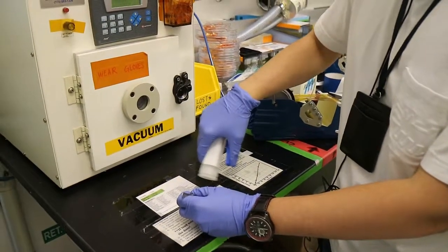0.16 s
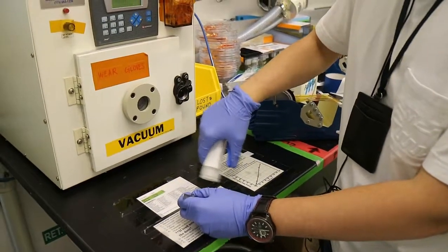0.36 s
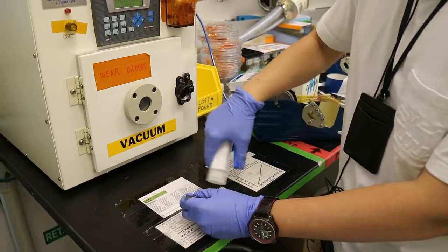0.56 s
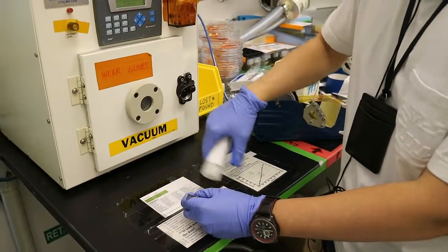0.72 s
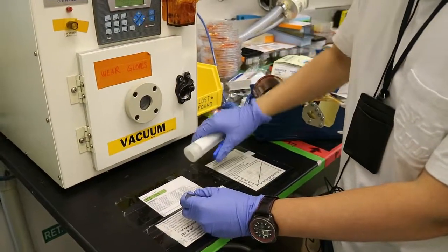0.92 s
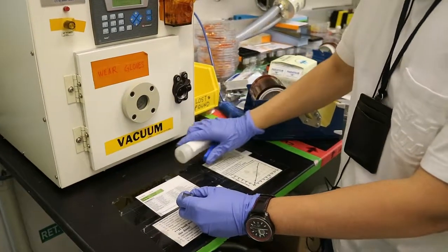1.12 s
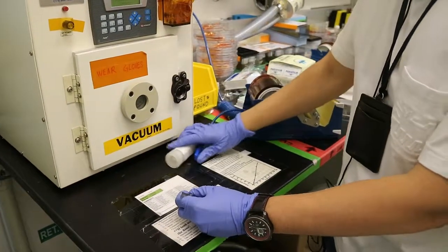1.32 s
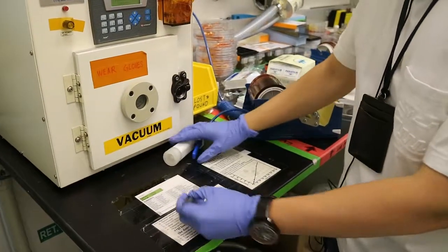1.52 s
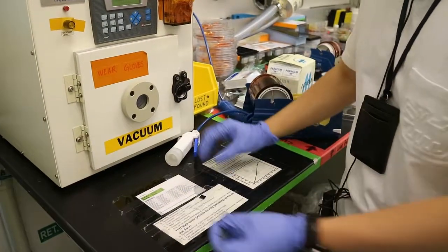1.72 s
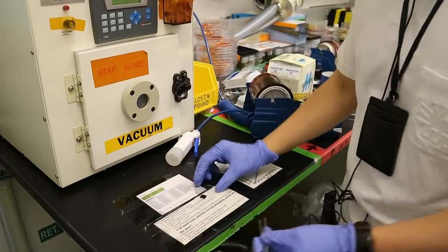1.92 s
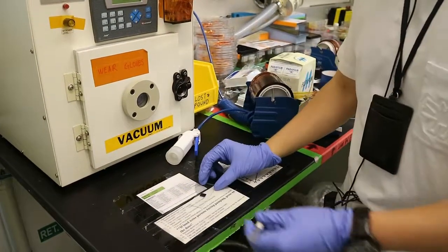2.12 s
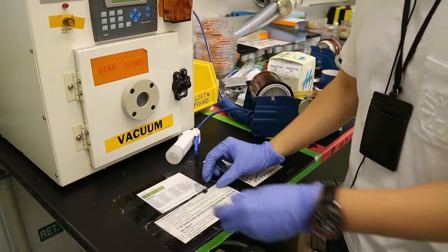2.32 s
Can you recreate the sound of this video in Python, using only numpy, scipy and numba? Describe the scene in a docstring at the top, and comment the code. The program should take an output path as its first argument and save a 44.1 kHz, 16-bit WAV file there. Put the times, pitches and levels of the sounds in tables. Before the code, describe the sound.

A handheld air blower hisses brightly and steadily, then shuts off sharply; after a short gap it lands on a bench with a light tap and one loud knock, over close pump buzz and ventilation in a small lab.

```python
"""A laboratory bench: a handheld air blower hisses, shuts off and is laid down with a tap and a hard knock.
The hiss is noise, partly passed through wandering nozzle resonances; the knocks are short pushes that ring
the bench. A small pump nearby ticks about sixty times a second through its ringing casing, over shaped
ventilation noise with thin tones. Brief small ticks include the bright click of the blower's first touch.
The phone's gain control creeps up while the sound is soft and ducks at the knock, whose peaks clip."""
import sys
import numpy as np
from scipy import signal
from scipy.fft import rfft, irfft
from scipy.io import wavfile
from scipy.ndimage import uniform_filter1d, map_coordinates
from numba import njit

SR = 44100
rng = np.random.default_rng(int(sys.argv[2]) if len(sys.argv) > 2 else 0)


def to_wav(sig):
    """Store sig (one row per channel, or 1-D mono) as 16-bit WAV at the path in sys.argv[1].

    Samples outside -1..1 are clipped; the rate is SR.
    """
    pcm = np.clip(np.atleast_2d(sig), -1, 1) * 32767
    pcm = np.round(pcm).astype(np.int16)
    wavfile.write(sys.argv[1], SR, pcm.T)  # frames by channels


def elevation(decibels):
    """Turn decibel levels (scalar or array-like) into linear amplitude ratios."""
    levels = np.asarray(decibels, float)
    return 10 ** (levels / 20)


N = 104428  # length in samples
MODE_SCATTER_DB = 1.5  # each resonance differs a little from blow to blow


@njit
def svf(x, hz, width):
    """Band-pass filter whose centre may move from sample to sample; gain 1 at the centre."""
    y, band, low = np.empty(len(x)), 0., 0.
    for i in range(len(x)):
        g, k = np.tan(np.pi * hz[i] / SR), width / hz[i]
        v = (band + g * (x[i] - low)) / (1 + g * (g + k))
        band = 2 * v - band
        low = low + 2 * g * v
        y[i] = k * v
    return y


def level(x, db):
    """Scale a sound so that its rms (average strength) is db."""
    return x * elevation(db) / np.sqrt(np.mean(x ** 2))


def colour(x, table):
    """Shape a spectrum through points of (Hz, dB), then set the rms to 1."""
    hz = np.arange(N // 2 + 1) * SR / N + 1
    point_hz, point_db = np.array(table).T
    gain = elevation(np.interp(np.log(hz), np.log(point_hz), point_db))
    return level(irfft(rfft(x) * gain, N), 0)


def walk(rate):
    """Slow random curve: levels held for 1 / rate seconds, then smoothed twice."""
    hold = int(SR / rate)
    steps = np.repeat(rng.standard_normal(N // hold + 1), hold)
    return 1.58 * uniform_filter1d(uniform_filter1d(steps, hold), hold)[:N]


def ring(x, hz, t60):
    """One resonance struck by x, dying away by 60 dB in t60 seconds."""
    return signal.lfilter([1], [1, -np.exp((2j * np.pi * hz - np.log(1000) / t60) / SR)], x).imag


def spikes(times, sizes):
    """Sharp clicks that may fall between samples, each drawn as a short windowed sinc."""
    out, at = np.zeros(N + 64), np.asarray(times) * SR
    for k in range(-7, 9):
        i = np.floor(at).astype(int) + k
        window = np.cos(np.pi * (i - at) / 17) ** 2
        np.add.at(out, np.clip(i, 0, N + 63), sizes * np.sinc(i - at) * window)
    return out[:N]


def jet(t):
    """Turbulent noise in wandering nozzle resonances; at shut-off level and pitch sag, treble first."""
    # The effort of the air jet. Each row: time in seconds, level in dB, extra treble in dB.
    effort = np.array([(0, -23, -1.5), (.1, -25.5, 5), (.24, -23.5, 1), (.27, -28.5, 6.5), (0.299, -22, 0),
                       (.45, -23, 4), (.6, -22.5, 3.5), (.75, -23, 1.5), (.865, -21.5, 1)])
    # Resonances of nozzle and jet. Each row: centre in Hz, rough width in Hz,
    # strength in dB (4.5 dB is taken off all of them).
    nozzle = [(793, 105, -9.5), (1224, 68, -17.5), (1570, 220, -11.5), (2720, 510, -6.5), (3450, 290, 0),
              (4057, 144, 1.5), (4650, 160, -9.5), (4800, 300, -10.5), (9600, 530, -2), (9300, 760, -5.5),
              (11760, 840, -13.5), (12500, 500, -27)]
    # Spectrum of the broad hiss. Each row: frequency in Hz, relative level in dB.
    broad_spectrum = [(300, -32), (1000, -11.5), (2000, -15.5), (4000, 4), (5500, -3), (7800, -7.5),
                      (9500, -6), (10700, -11.5), (12000, -6.5), (13500, -7.5), (14600, -7), (15700, -10)]
    shut_s, shut_db_per_s, shut_treble_db_per_s, shut_sag_per_s = 0.863, -350, -200, -1.4
    surge_db, broad_flicker_db, flicker_db = .8, 1.5, .5
    broad_db, treble_hz = -3, 7000
    mirror_db, mirror_s, mirror_wander_s = -9, .0008, .00008

    shut = np.clip(t - shut_s, 0, .3)  # seconds since shut-off, at most 0.3
    db = np.interp(t, effort[:, 0], effort[:, 1]) + shut_db_per_s * shut + surge_db * walk(29.67)
    treble = np.interp(t, effort[:, 0], effort[:, 2]) + shut_treble_db_per_s * shut

    # The broad hiss follows the treble by half.
    hiss_gain = elevation(broad_db + .5 * treble + broad_flicker_db * walk(64.2))
    out = hiss_gain * colour(rng.standard_normal(N), broad_spectrum)
    # The bench reflects it, with a delay that wanders as the hand moves.
    delayed = (t - mirror_s - mirror_wander_s * walk(5)) * SR
    out += elevation(mirror_db) * map_coordinates(out, [delayed], mode="mirror")

    for hz, width, peak_db in nozzle:
        centre = hz * np.clip(1 + .004 * walk(25.8) + shut_sag_per_s * shut, .5, 1.1)
        # Filtering twice narrows the band, so each pass is made wider.
        once = svf(rng.standard_normal(N), centre, 1.48 * width)
        band = level(svf(once, centre, 1.48 * width), peak_db - 4.5)
        out += band * elevation(flicker_db * walk(40.7) + treble * (hz > treble_hz))
    return out * elevation(db)


def knocks(t):
    """The blower meets the bench: smooth pushes ring its resonances, plus a noisy crack and a thud."""
    # The blows. Each row: start in seconds, level in dB, contact time in seconds,
    # crack level in dB, tilt of the ringing in dB per octave (around 1000 Hz).
    blows = [(1.3742, -6.5, 0.00054, -20, -4.5), (1.381, -14, .001, -27, 9), (1.3915, -21, 0.0007, -25, -1),
             (1.401, -27, .001, -30, -9), (1.4122, 8.5, 0.00028, -21, 2), (1.416, 8.5, 0.00051, -25, 5),
             (1.4195, 7.5, 0.00047, -30, -3), (1.4315, -22, 0.00015, -28.5, -3),
             (1.447, -25, 0.0005, -33, -10), (1.467, -5, 0.0013, -29, 6)]
    # Resonances of bench and blower. Each row: frequency in Hz, level in dB,
    # time to fall 60 dB in seconds (capped below).
    bench = [(410, -11, .07), (510, -11, .05), (600, -10, .05), (685, 0, .045), (820, -5, .04),
             (1000, -2, .035), (1227, -5, .035), (1500, -8, .03), (1760, -10, .02), (2000, -12, .02),
             (2330, -11, .02), (2750, -10, .015), (3400, -10, .013), (4400, -10, .01)]
    crack_s, crack_top_hz = 0.00054, 4970
    thud_hz, thud_db = 187, -18
    ring_cap_s_hz, bench_low_hz = 45, 250  # longest ring in seconds times Hz; low limit

    out, weights = np.zeros(N), rng.standard_normal((len(blows), len(bench)))
    for (at, db, contact, crack_db, tilt_db), chance in zip(blows, weights):
        since = np.clip(t - at, 0, 1)
        push = np.sin(np.pi * np.clip(since / contact, 0, 1)) ** 2
        push = push / push.sum()
        body = 0
        for k, (hz, mode_db, t60) in enumerate(bench):
            mode_gain = elevation(mode_db + tilt_db * np.log2(hz / 1000) + MODE_SCATTER_DB * chance[k])
            # Neighbouring resonances get opposite signs.
            body = body + (-1) ** k * mode_gain * ring(push, hz, min(t60, ring_cap_s_hz / hz))
        burst = (t > at) * np.exp(-since / crack_s) * rng.standard_normal(N)
        crack = svf(burst, np.full(N, .5 * crack_top_hz), 1. * crack_top_hz)
        thud = ring(push, thud_hz, 0.01)
        out += elevation(db) * (.5 * body + elevation(crack_db) * crack + elevation(thud_db) * thud)
    # The knocks keep little bass.
    return signal.lfilter(*signal.butter(1, bench_low_hz, "high", fs=SR), out)


def small_ticks(t):
    """Brief small ticks, among them the bright click of the blower's first touch on the bench."""
    # Noise bursts that ring one resonance each.
    # Each row: start in seconds, frequency in Hz, level in dB, time to fall 60 dB in seconds.
    tick_table = [(.18, 1600, -26, .05), (.845, 900, -22, .06), (1.3748, 3600, -12, .012),
                  (2.045, 11500, -21, .003), (2.076, 1620, -13, .02)]
    out = 0
    for at, hz, db, t60 in tick_table:
        fade = (t > at) * np.exp(-np.clip(t - at, 0, 1) / 0.0021)
        burst = fade * rng.standard_normal(N) / 7
        out = out + elevation(db) * svf(ring(burst, hz, t60), np.full(N, 1. * hz), 1. * hz)
    return out


def pump():
    """Each stroke ticks the casing and lets out a short noisy puff; every second tick is weaker."""
    # Resonances of the pump casing. Each row: frequency in Hz, level in dB,
    # time to fall 60 dB in seconds (at most 0.02 for the puffs), lag after the stroke in seconds (ticks only).
    casing = [(775, -14, .1, .001), (2325, -9, .08, .0005), (2700, -3, .03, .0005), (3030, -5, .03, .0005),
              (3300, -1, .03, .0005), (3490, -4, .04, .001), (4070, -5, .04, .001), (4330, 2, .08, .003),
              (4495, 4, .08, .004), (4640, -5, .06, .003), (5270, 1, .02, .001), (5570, -3, .025, .001),
              (5830, 0, .02, .001), (6060, -2, .02, .001)]
    strokes_hz, first_s = 59.61, .0137
    stroke_scatter_db, stroke_jitter_s, alternate_db = 1.0, .000008, -1
    pump_db, puff_db, puff_s = -32.5, -3, 0.0018

    times = np.arange(first_s, N / SR, 1 / strokes_hz)
    chance = rng.standard_normal((len(times), 2 + len(casing)))
    stroke_db = stroke_scatter_db * chance[:, 0]
    weaker_db = alternate_db * (np.arange(len(times)) % 2)
    strokes = spikes(times, elevation(stroke_db))
    puff = signal.lfilter([1], [1, -np.exp(-1 / (puff_s * SR))], strokes) * rng.standard_normal(N)
    ticking = puffing = 0
    for k, (hz, db, t60, lag) in enumerate(casing):
        hit_times = times + lag + stroke_jitter_s * chance[:, 1]
        hit = spikes(hit_times, elevation(stroke_db + MODE_SCATTER_DB * chance[:, 2 + k] + weaker_db))
        ticking = ticking + (-1) ** k * level(ring(hit, hz, t60), db)
        puffing = puffing + level(ring(puff, hz, min(t60, .02)), db)
    return level(level(ticking, 0) + level(puffing, puff_db), pump_db)


def air(t):
    """Ventilation: shaped noise that swells slowly, with a few thin tones of wavering level."""
    # Steady-pitched tones. Each row: frequency in Hz, middle level in dB.
    hum = [(432, -48.5), (492, -52.5), (1738, -48)]
    # Spectrum of the ventilation noise. Each row: frequency in Hz, relative level in dB.
    air_spectrum = [(30, -60), (100, -28), (190, -15), (210, -8), (330, -9), (450, 2), (620, -4.5),
                    (790, -2.5), (1250, -4), (1690, -12.5), (2140, -10), (3500, -10), (4830, -12.5),
                    (6200, -15), (8200, -21), (9500, -17.5), (10500, -22.5), (12000, -24), (15700, -35.5)]
    air_db = -30.5
    tones = 0
    for hz, db in hum:
        tones = tones + elevation(db + 2.0 * walk(7.04)) * np.sin(2 * np.pi * (hz * t + rng.random()))
    return elevation(air_db + 1.0 * walk(5.06)) * colour(rng.standard_normal(N), air_spectrum) + tones


def room(x, db):
    """Add the room's echo: a dense fading tail of noise, duller than the source."""
    t60 = 0.17  # seconds
    t = np.arange(SR // 2) / SR
    tail = np.exp(-np.log(1000) * t / t60) * rng.standard_normal(SR // 2) * (t > .004)
    tail = signal.lfilter([1], [1, -.5], tail)
    return x + elevation(db) * signal.fftconvolve(x, tail / np.sqrt(np.sum(tail ** 2)))[:N]


@njit
def gain_control(x, db, rise, top, attack, most):
    """Gain creeps towards its maximum and is pulled down while the output is over the top."""
    y = np.empty(len(x))
    for i in range(len(x)):
        y[i] = x[i] * 10 ** (db / 20)
        over = 20 * np.log10(abs(y[i]) + 1e-9) - top
        db += (most - db) * rise / SR - max(over, 0.) / (attack * SR)
    return y


def scene():
    """All sources together, mono; the numbers are echo levels in dB."""
    t = np.arange(N) / SR
    bench_work = room(jet(t), -15) + room(knocks(t), -9) + small_ticks(t)
    background = room(pump(), -14) + air(t)
    return (bench_work + background)[None]


def low_pass(x):
    """Removes everything above the highest recorded frequency."""
    return signal.sosfilt(signal.butter(12, 16740, fs=SR, output="sos"), x)


def record(dry):
    """The phone: gain control, bass roll-off, clipping of the peaks, then a steep treble cut."""
    start_db, rise_per_s, top_db, attack_s, max_db = -4., .36, -7.5, .0018, 16.
    mic_low_hz, top_hz = 129, 15720
    x = gain_control(dry[0], start_db, rise_per_s, top_db, attack_s, max_db)
    x = signal.sosfilt(signal.butter(2, mic_low_hz, "high", fs=SR, output="sos"), x)
    x = np.clip(x, -.97, .97)
    x = signal.sosfilt(signal.ellip(10, .2, 70, top_hz, fs=SR, output="sos"), x)
    return low_pass(x[None])


dry = scene()
out = record(dry)
to_wav(out)
```